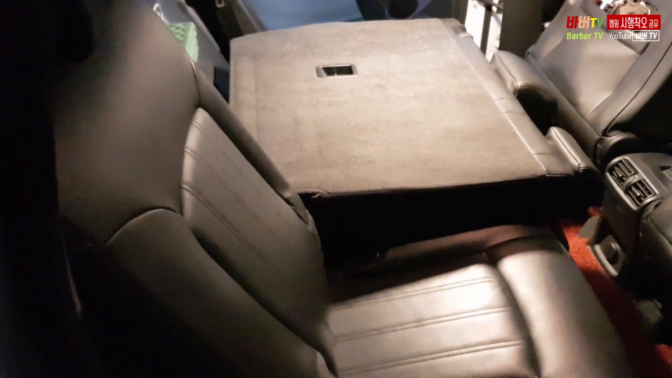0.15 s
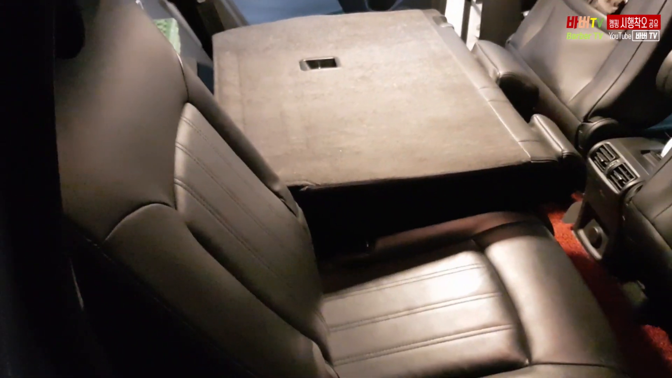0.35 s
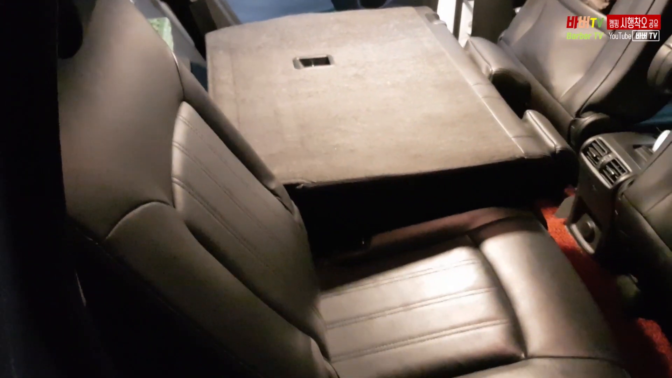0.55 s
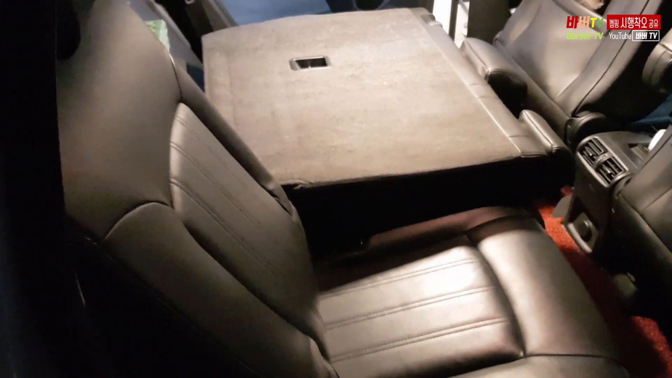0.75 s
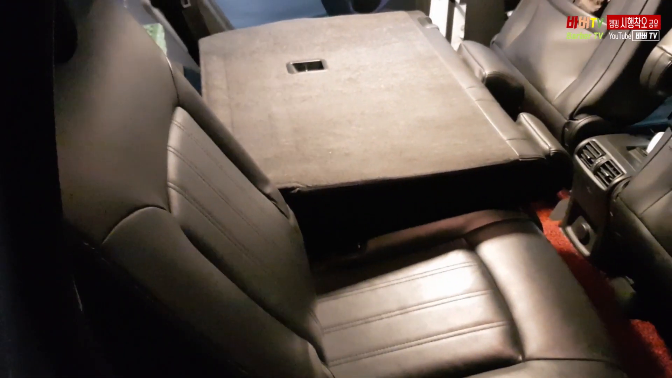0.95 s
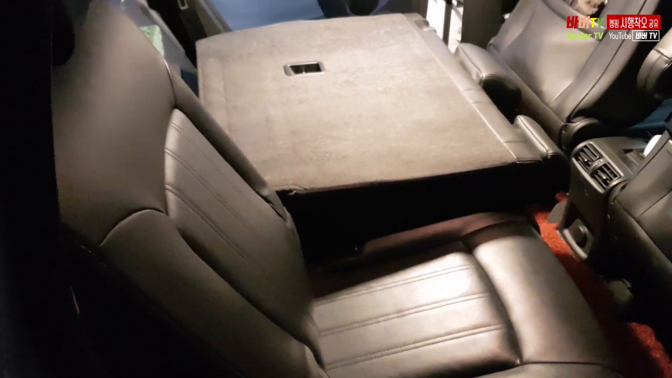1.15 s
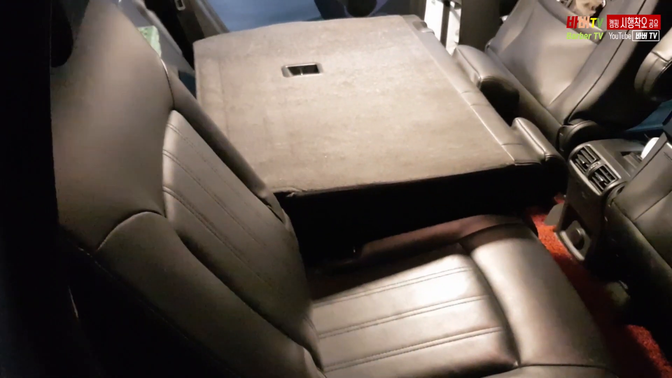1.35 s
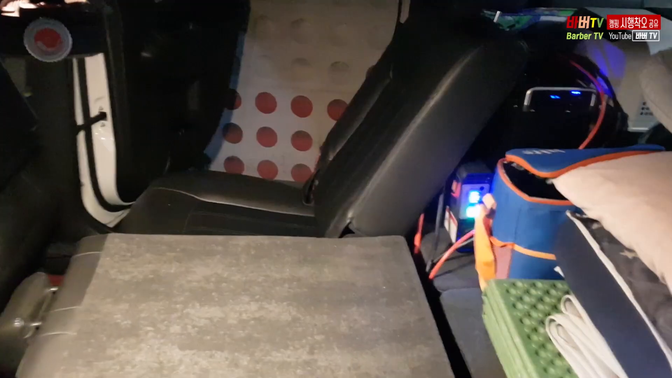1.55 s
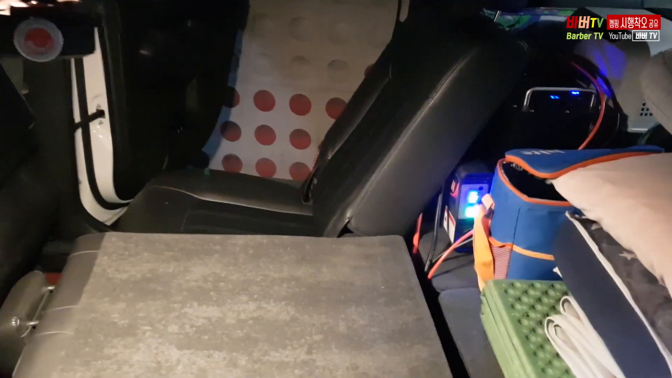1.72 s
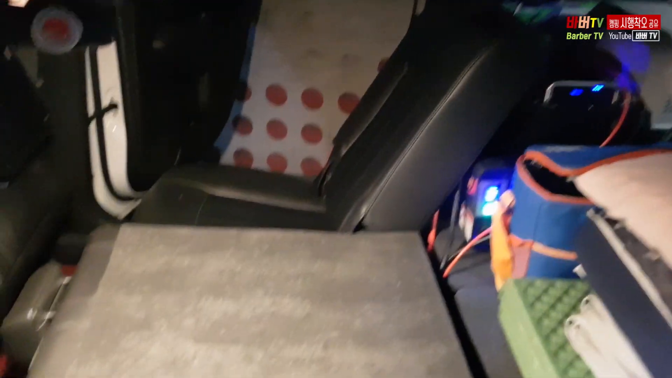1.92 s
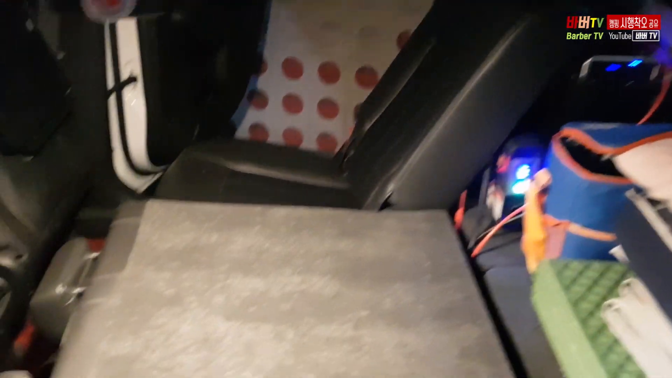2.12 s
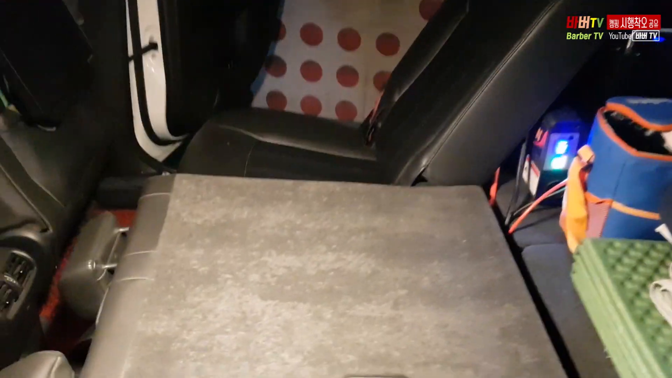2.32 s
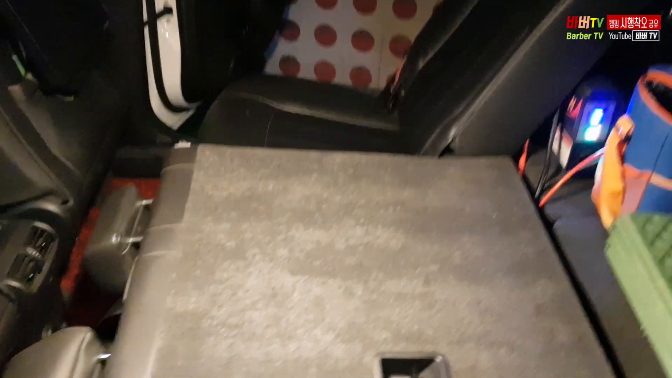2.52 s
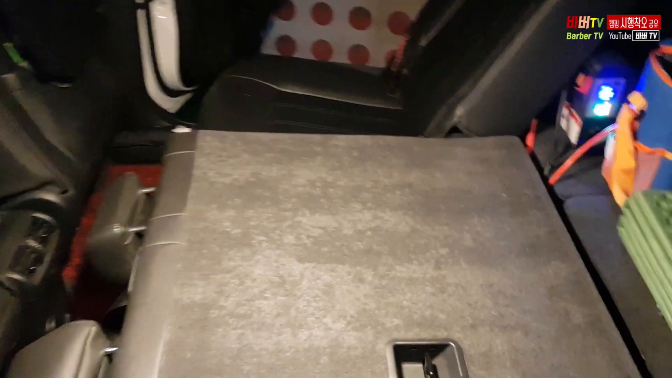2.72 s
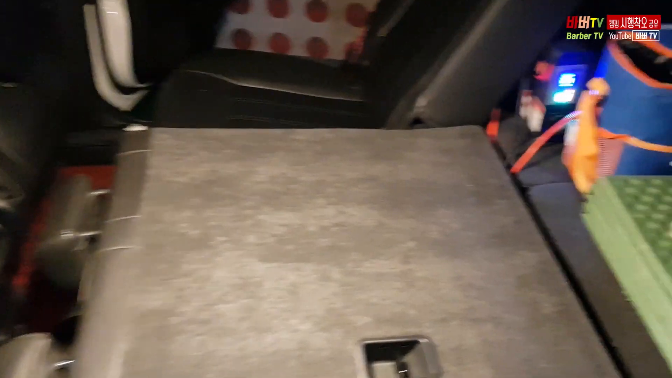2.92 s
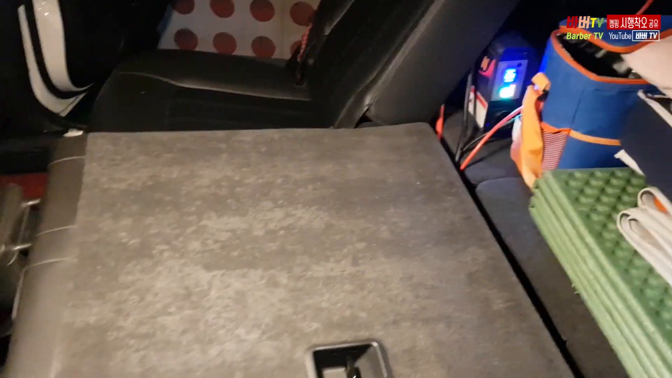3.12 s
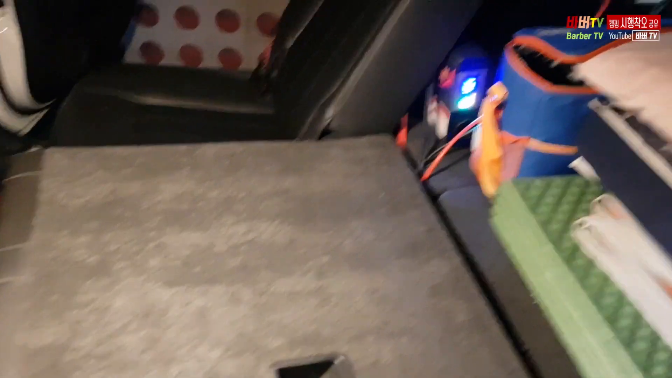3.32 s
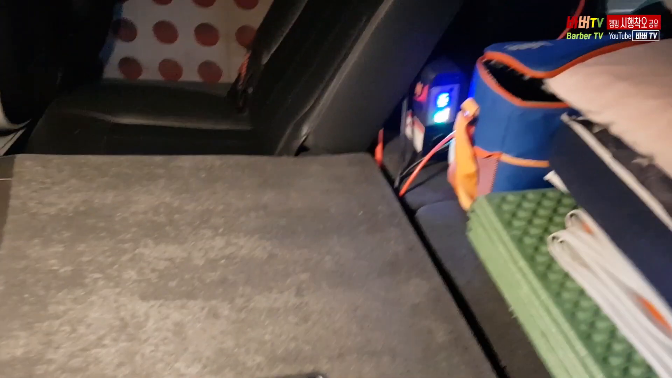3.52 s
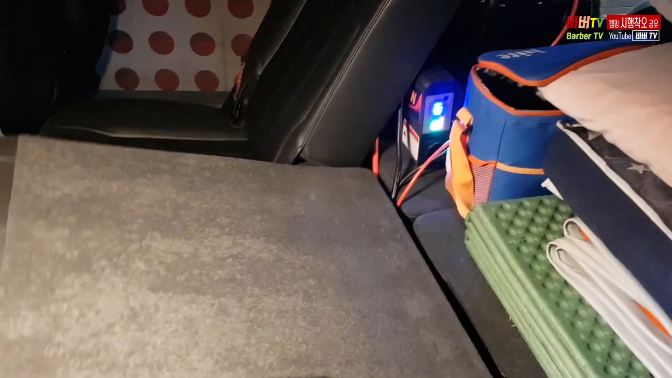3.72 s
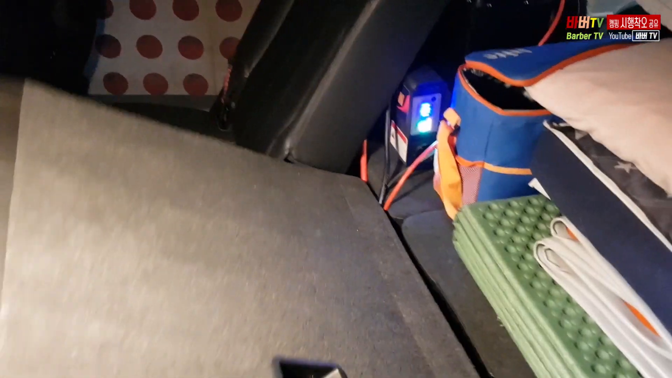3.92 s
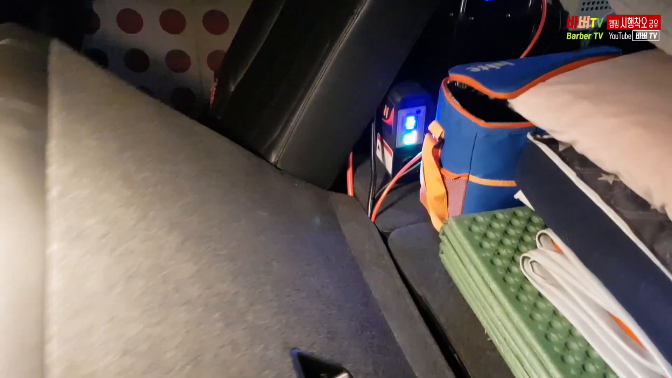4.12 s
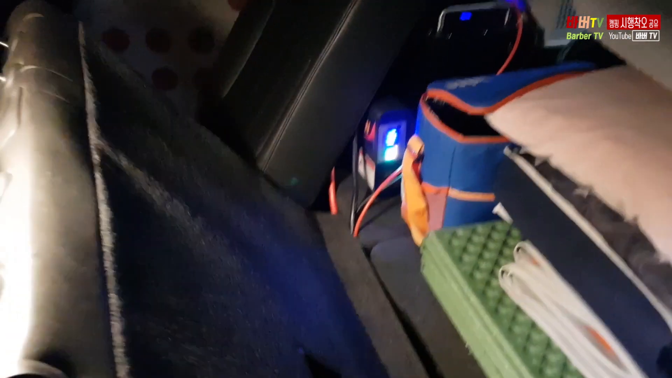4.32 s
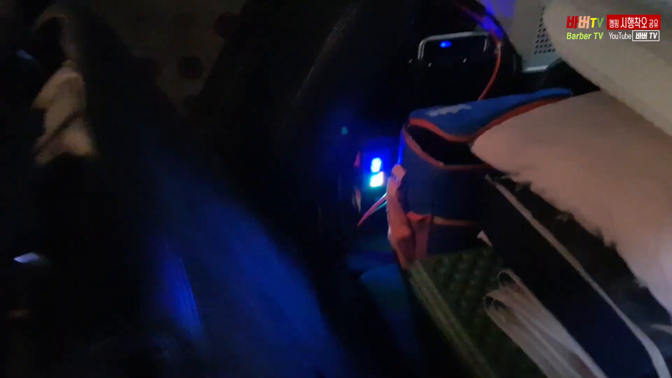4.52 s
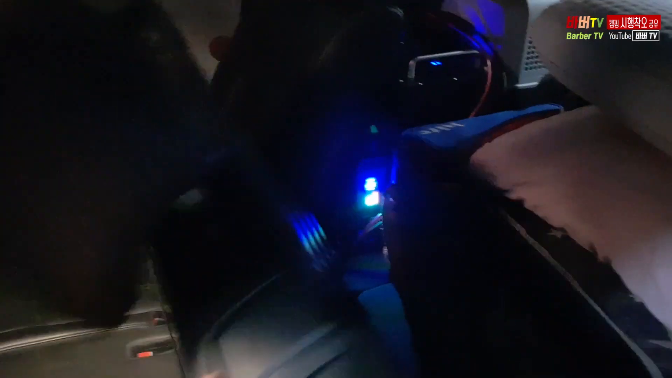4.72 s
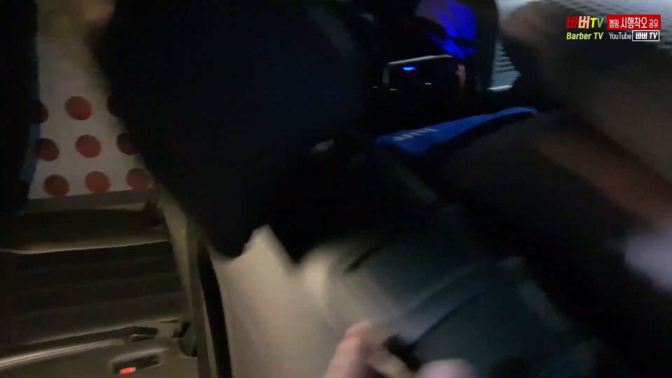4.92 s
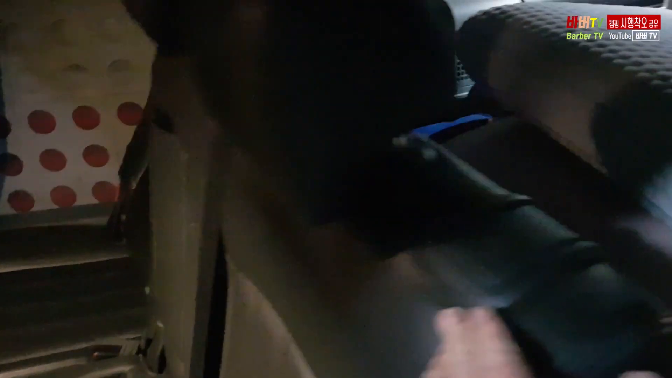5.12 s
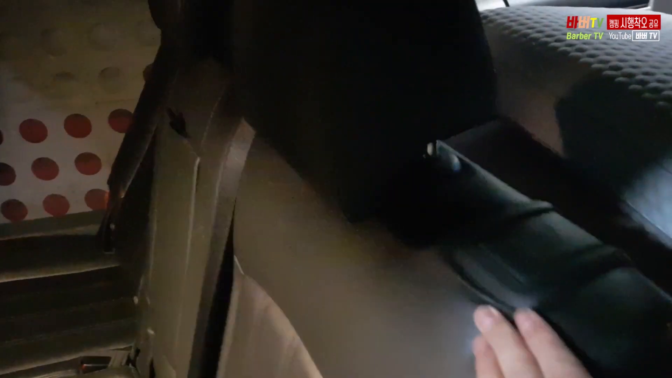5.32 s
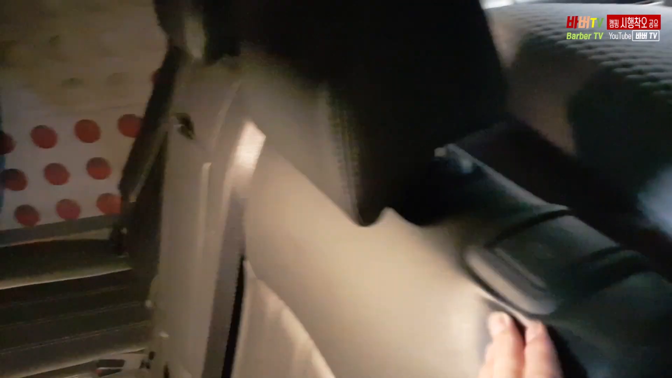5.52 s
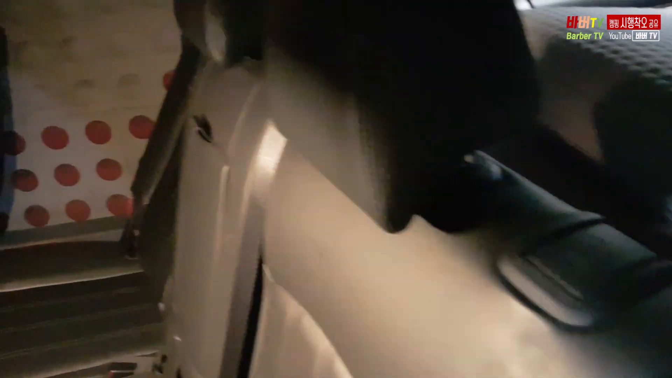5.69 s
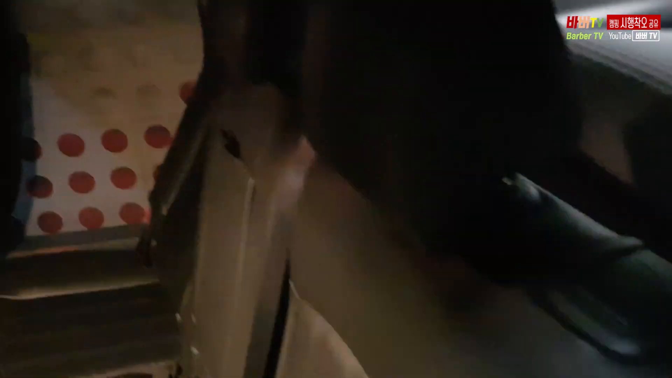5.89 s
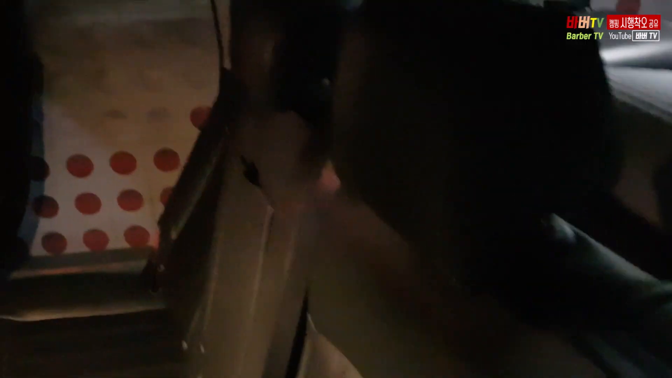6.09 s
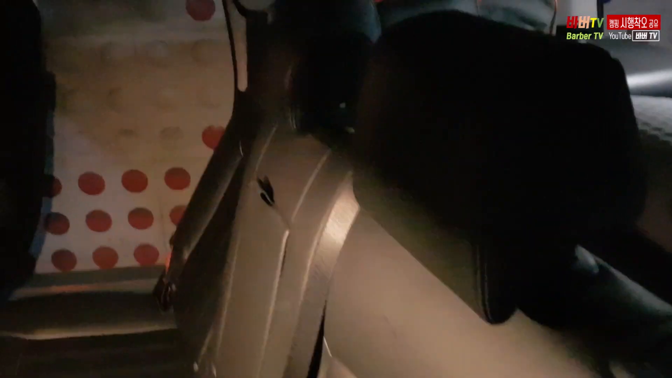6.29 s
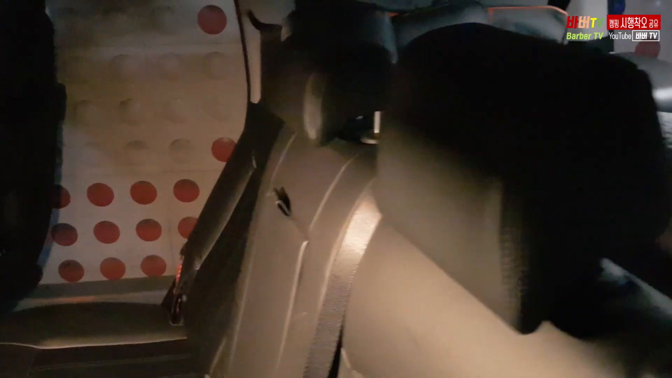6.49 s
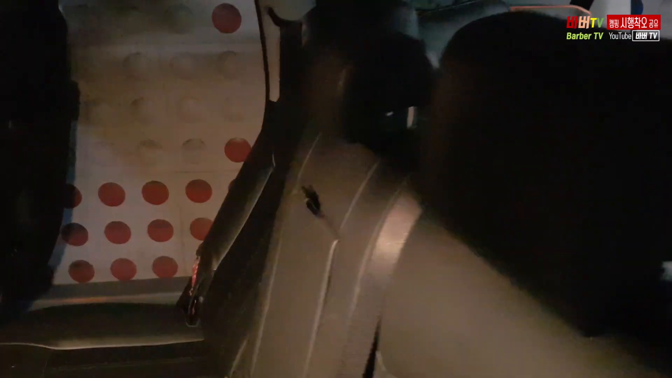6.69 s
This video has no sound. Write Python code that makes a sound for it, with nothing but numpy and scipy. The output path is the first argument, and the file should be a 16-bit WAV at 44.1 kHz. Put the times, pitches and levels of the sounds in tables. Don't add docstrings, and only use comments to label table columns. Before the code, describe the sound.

Inside a quiet car, short leather squeaks, scattered latch clicks, a loud clack with jingling metal, and a final heavy seatback clunk.

```python
import sys
import numpy as np
from scipy import signal
from scipy.fft import rfft, irfft, next_fast_len
from scipy.io import wavfile

SR = 44100
rng = np.random.default_rng(int(sys.argv[2]) if len(sys.argv) > 2 else 0)


def to_wav(s):
    ch = np.atleast_2d(s).T
    pcm = np.round(np.clip(ch, -1, 1) * 32767)
    wavfile.write(sys.argv[1], SR, pcm.astype(np.int16))


def elevation(decibels):
    levels = np.asarray(decibels, float)
    return 10 ** (levels / 20)


N = 297660
TIME_S = np.arange(N) / SR
STROKE_TIME_S = np.arange(0, N / SR, .001)

# t/s, level/dB
SHAKE = [(0, -38), (.25, -52.5), (.6, -43), (.92, -52.5), (1.6, -42.5), (1.9, -55), (2.05, -42.5),
         (2.2, -55), (3.1, -55.5), (3.4, -37.5), (3.65, -53), (3.8, -49), (4.7, -46), (5.2, -40.5),
         (5.36, -28), (6.0, -46.5), (6.75, -45.5)]
# f/Hz, density/dB
SHAKE_SPECTRUM = [(12, -38), (20, -3), (38, -4), (54, 1), (111, -7.5), (140, -11.5), (180, -44.5),
                  (310, -120)]
# t/s, level/dB
LOAD = [(0, -54), (.4, -56), (.6, -59.5), (.92, -69), (1.02, -51), (1.15, -65), (3.16, -62.5), (3.3, -44),
        (4.55, -47.5), (4.7, -35.5), (4.9, -41), (5.24, -45), (5.36, -23.5), (5.7, -42.5), (6.0, -61),
        (6.7, -63.5), (6.75, -62)]
# f/Hz, density/dB
LOAD_SPECTRUM = [(59, -30.5), (100, -4), (151, -0.5), (404, -8.5), (490, -18.5), (1000, -19.5), (1300, -48),
                 (2200, -120)]
# f/Hz, density/dB
AIR_SPECTRUM = [(380, -34.5), (650, -13), (714, -8), (974, -7), (3690, -13.5), (7600, -19.5),
                (12100, -18.5), (16200, -8.)]
# f/Hz, likeness/1
LIKENESS = [(40, 1), (300, .9), (700, 0.088), (1500, 0), (5000, 0.19), (15000, 0)]
# t/s, level/dB
FAN = [(0, -86), (.5, -80), (1.7, -78), (2.3, -75.5), (4.0, -75), (5.5, -83.5), (6.1, -93), (6.75, -92.5)]
# f/Hz, width/Hz, level/dB
FAN_BANDS = [(7350, 1200, 1.5), (12000, 1600, -3.5), (14800, 3500, -1.5)]
# start/s, end/s, level/dB, centre at start f/Hz, centre at end f/Hz
SLEEVE = [
    (0.784, 1.033, -62, 4830, 4810),
    (1.27, 1.415, -58, 4420, 2700),
]
# t/s, peak level/dB
TWANGS = [
    (5.557, -46),
    (5.673, -39.5),
    (5.79, -53),
]
# f/Hz, level/dB, t60/s
SPRING_MODES = [(4470, -11, 0.12), (4630, -17, 0.14), (4400, -17, .17), (4310, -21, 0.19)]
RING_HZ = [7420, 8200, 10525, 11956, 12592, 13780, 14086]
# t60/s, left minus right level/dB
RING_MODES = [(.3, 8), (.3, 4), (.4, 2.5), (.5, 6), (.15, 7.5), (.25, 6.5), (.5, 4.5)]
# t/s, peak level/dB, struck mode f/Hz, duration/s
JINGLE = [(4.567, -26, 12592, 0.035), (4.567, -37.5, 8200, 0.015), (4.572, -31.5, 14086, 0.062),
          (4.578, -33, 11956, 0.06), (4.575, -43, 7420, 0.06), (4.585, -38.5, 10525, 0.055),
          (4.606, -25, 13780, 0.018), (4.616, -35, 12592, 0.026), (4.64, -42.5, 7420, 0.015),
          (4.645, -27, 12592, 0.014), (4.645, -26.5, 13780, 0.012), (4.66, -18.5, 13780, 0.012),
          (4.66, -27, 10525, 0.008), (4.664, -31.5, 7420, 0.012), (4.672, -36.5, 8200, 0.03),
          (4.68, -30.5, 13780, 0.03), (4.69, -34.5, 10525, 0.05), (4.692, -39.5, 11956, 0.018),
          (4.712, -43, 13780, 0.02), (4.715, -43, 7420, 0.014), (4.747, -36.5, 7420, 0.019),
          (4.747, -28, 13780, 0.008), (4.747, -43, 10525, 0.012), (4.756, -25.5, 13780, 0.014),
          (4.756, -44, 11956, 0.02), (4.772, -33, 13780, 0.008), (4.772, -40, 7420, 0.01),
          (4.862, -53, 7420, 0.023), (4.897, -48, 7420, 0.02), (4.897, -41, 13780, 0.01),
          (4.911, -39, 13780, 0.008), (4.922, -44.5, 7420, 0.02), (4.922, -39, 13780, 0.022),
          (4.925, -52, 11956, 0.02), (4.945, -37, 7420, 0.008), (4.955, -28, 13780, 0.01),
          (4.955, -39, 8200, 0.045), (4.962, -34, 10525, 0.07), (4.963, -33.5, 7420, 0.008),
          (4.975, -26.5, 13780, 0.022), (4.976, -43, 7420, 0.024), (5.002, -49, 11956, 0.062),
          (5.005, -44.5, 13780, 0.025), (5.02, -46.5, 7420, 0.012), (5.0, -49, 8200, 0.08),
          (5.066, -44, 13780, 0.028), (5.066, -45, 10525, 0.028), (5.066, -49, 11956, 0.023),
          (5.105, -64, 10525, 0.025)]
# middle t/s, peak level/dB, f/Hz, half length/s
SQUEAKS = [(0.046, -20, 2388, 0.006), (0.064, -7.5, 2190, 0.0022), (0.074, -13.5, 1816, .008),
           (0.116, -20.5, 2374, 0.0038), (0.133, -3.5, 2280, .0035), (0.148, -10, 2194, 0.0024),
           (0.156, -7, 2267, 0.0022), (0.159, -15, 2283, 0.0053), (3.106, -44, 1135, 0.0066),
           (3.136, -45.5, 1216, 0.0177), (4.0145, -26, 2290, .0012), (4.018, -26, 2300, 0.0011),
           (4.033, -25.5, 2070, 0.0017), (4.068, -31, 2180, 0.0012), (4.146, -27.5, 2160, 0.00081),
           (4.218, -35.5, 2200, 0.0023), (4.311, -25.5, 2170, .003), (4.318, -24.5, 2200, 0.0018),
           (4.347, -21.5, 2050, .0015), (4.394, -8.5, 4600, 0.00092)]
# t/s, left minus right level/dB
BEARING = [(0, -2), (1.58, 7.5), (1.7, 16.5), (1.78, -1), (3.3, -2.5), (4.02, -8.5), (4.38, -2.5),
           (4.66, 5.5), (5.07, 6.5), (5.25, 1), (5.3, -6), (5.7, -4)]
# t/s, swell/s, fade/s, peak level/dB, sheen against rub level/dB
STROKES = [(.026, .004, 0.089, -15.5, -34), (0, 0.1589, .015, -20, -17.5), (0.17, .001, 0.088, -44, -9.5),
           (.3, .001, 4.8, -70, -7.5), (1.6, 0.03, 0.19, -74, 8.), (1.765, .03, 0.12, -46.5, -4),
           (1.929, .01, 0.086, -42, -9), (2.524, .135, 0.086, -47.5, -3), (2.698, .31, 0.0069, -62, 6),
           (3.022, .01, 0.041, -48.5, -2), (3.06, 0.0551, 0.1, -42.5, -7.5), (3.236, .015, .12, -39.5, -6),
           (3.3, .71, 0.19, -57.5, -7), (3.38, 0.08, 0.2, -49, -11.5), (4.013, .004, 0.086, -34.5, -6),
           (4.19, 0.15, 0.26, -30, -10), (4.11, .01, 0.13, -49.5, -7.5), (4.55, 0.028, 0.07, -32, -0.5),
           (4.659, .004, .04, -33, -3), (4.745, .085, .014, -36, -6.5), (4.85, 0.13, 0.0542, -42.5, -3.5),
           (5.0, 0.00084, 0.38, -49, -2.5), (5.251, .003, .014, -26, -25), (5.258, 0.01, .1, -36.5, -24.5),
           (5.38, 0.0091, 0.22, -51.5, -24), (5.599, .001, 0.31, -67, -4.5), (5.618, .045, .025, -67, 8.5)]
# f/Hz, density/dB
RUB_SPECTRUM = [(450, -44.5), (600, -25), (850, -23), (1400, -6.5), (2100, -3), (2450, -7.5), (4000, -15.5),
                (6000, -28.5)]
# f/Hz, density/dB
SHEEN_SPECTRUM = [(2650, -33), (4500, -8.5), (6520, -4.5), (7260, -6), (8170, -7), (14100, -16),
                  (17300, -22.5)]
# t/s, peak level/dB, f/Hz, t60/s,
# sharpness Q/1
SNAPS = [(.1575, -17, 2284, 0.018, 13), (.17, -44, 2260, 0.54, 14.), (.17, -37.5, 3303, 0.55, 0.9),
         (1.6195, -41, 8000, .008, 1.8), (1.625, -46, 9000, .008, 1.4), (1.65, -45, 9000, 0.0081, 1.5),
         (1.657, -45, 12470, .008, 2.5), (1.663, -45, 9000, .008, 1.5), (1.667, -36.5, 850, 0.013, 0.75),
         (1.667, -36.5, 5980, 0.01, 8.), (1.776, -44, 2000, 0.015, 1.7), (1.956, -41.5, 2190, 0.019, 3.5),
         (2.015, -42, 2070, 0.017, 2.5), (3.032, -30.5, 10990, 0.012, 2.5), (3.125, -36, 4500, .01, 1.5),
         (3.243, -25, 830, 0.24, 0.89), (3.242, -21, 2500, 0.016, 2.8), (3.29, -36.5, 2030, 0.07, 2.1),
         (4.194, -33.5, 2220, .05, 8.4), (4.225, -41.5, 1369, .15, 20.), (4.327, -25, 2110, .03, 6.),
         (4.405, -21, 1300, .015, 1.2), (4.5595, -20.5, 8500, 0.017, 1.7), (4.57, -20, 2096, 0.09, 3.),
         (4.6455, -8.5, 12530, .035, 2.5), (4.66, -4.5, 11510, .025, 2.), (4.666, -15.5, 10500, 0.074, 1.5),
         (4.679, -20, 13020, 0.055, 2.5), (4.774, -26, 13510, .06, 3.5), (4.826, -25, 5190, .015, 3.1),
         (4.89, -33.5, 1895, 0.033, 4.), (4.945, -29, 10400, 0.023, 5.5), (4.955, -19.5, 13090, .03, 3.5),
         (5.068, -33, 13000, 0.14, 3.5), (5.271, -17, 10500, 0.022, 1.5), (5.272, -12, 4400, 0.023, 3.8),
         (5.295, -39.5, 12000, .03, 1.5),
         (5.558, -55, 4480, 0.11, 16), (5.672, -50.5, 4500, 0.17, 16), (5.795, -61, 4420, 0.22, 12.),
            (5.62, -53, 1340, 1, 7.), (4.662, -19, 9500, 0.2, 1.8), (5.275, -35.5, 12000, .3, 1.5),
            (5.378, -48.5, 7500, .03, 2.5), (5.1, -41.5, 1800, .03, 3.5), (6.65, -52, 4000, .02, 1.2),
            (6.738, -54.5, 3000, .05, 1.1), (4.572, -24, 11000, .3, 1.6), (4.69, -30, 12000, .3, 1.6),
            (4.752, -28, 10000, .15, 1.6), (5.406, -49, 4600, .04, 30.), (5.605, -31, 670, .02, 1.1),
            (0.22, -45, 1830, .8, 12.), (1.589, -47, 450, 0.0093, 1.), (5.35, -34.5, 1640, 0.93, 2.3),
            (4.86, -42, 9500, .9, 1.3)]
# t/s, peak level/dB, share above 5 kHz level/dB, main ring f/Hz
TICKS = [(0.0264, -8, -26.5, 2350), (.123, -18.5, -22, 1430), (0.15, -18, -16, 1210),
         (1.589, -50, -13.5, 1062), (1.613, -46, 0.5, 7400), (1.634, -42.5, -1, 7400),
         (1.802, -37, -13.5, 1843), (1.819, -37, -9.5, 1820), (1.834, -33, -5.5, 1800),
         (1.855, -32, -19.5, 1860), (1.886, -38.5, -6.5, 2500), (2.158, -36, 3, 2150),
         (2.663, -27.5, -1.5, 2080), (2.92, -31, -1, 2290), (3.018, -31, -1, 2980),
         (3.037, -28.5, -3, 2224), (3.280, -21, -39, 2000), (3.337, -28.5, -6.5, 1700),
         (4.033, -26.5, -13, 2292), (4.095, -34, 0, 2198), (4.145, -26.5, -5, 2140),
         (4.346, -18.5, -5, 2000), (4.552, -26, -8.5, 2150), (4.647, -20.5, -12, 2040),
         (4.677, -26, -4.5, 5328), (4.827, -23, -25.5, 2000), (5.294, -25, -40.5, 2063),
         (5.31, -27, -43, 2000), (5.324, -28.5, -42.5, 1860), (5.605, -33.5, -37, 940)]
# t/s, peak level/dB, share above 5 kHz level/dB, main ring f/Hz, t60/s
CLACKS = [(1.6668, -20.5, 19.5, 1510, 0.0058), (1.937, -48, -9.5, 1755, 0.032),
          (2.525, -35, -36, 3680, 0.063), (3.222, -24.5, -7.5, 1880, 0.12), (3.243, -10, -11, 1850, 0.011),
          (3.436, -34, -27, 1490, 0.089), (4.013, -32.5, -18.5, 2440, 0.019),
          (4.335, -15.5, -8, 3132, 0.03), (4.385, -7, -11.5, 1500, 0.039), (4.442, -2.5, -3.5, 1870, .015),
          (4.566, 7, -11.5, 2094, 0.033), (4.66, -11.5, -7.5, 4860, 0.044),
          (4.748, -14, -13.5, 2150, 0.053), (4.804, -18, -13, 4800, 0.028), (4.955, -19.5, 12, 1392, 0.029),
          (4.963, -22, -5.5, 3950, 0.032), (4.979, -12, -4.5, 1792, 0.055), (5.065, -22, -7.5, 1735, 0.023),
          (5.267, -14, -31, 1260, 0.03), (5.2705, -3, -22, 1880, 0.041)]
# f/Hz, width/Hz, level/dB
LATCH_MODES = [(1230, 630, -5), (2000, 1100, -1), (2700, 350, -8.5), (3740, 620, -12.5), (5040, 1100, -8.5),
               (7415, 1300, -7)]
# t/s, knock peak level/dB, knock f/Hz, boom level/dB, boom f/Hz
KNOCKS = [
    (1.667, -22.5, 233, -17.5, 83.6),
    (4.442, -15, 337.7, -38.5, 109.7),
]
# t/s, knock peak level/dB, knock f/Hz, boom level/dB, boom f/Hz
THUDS = [(3.243, -13.5, 217, -28, 82.3), (3.279, -11.5, 158, -25.5, 76.5), (3.311, -16.5, 153, -40.5, 120),
         (3.338, -18.5, 200, -20, 80.7), (3.432, -37, 158, -42, 85.2), (3.965, -32, 145, -34.5, 91),
         (4.387, -12, 185, -33.5, 113), (4.404, -23, 282.5, -30, 118), (4.552, -23, 241, -39, 111),
         (4.663, -19.5, 187, -24.5, 56.4), (4.984, -21.5, 218, -38, 120), (5.005, -21, 283.3, -37.5, 118),
         (5.267, -6.5, 167, -19, 122.1), (5.289, -6.5, 268, -13, 53), (5.304, -7.5, 121, -35, 46.1),
         (5.329, -18.5, 306, -22, 38.2), (5.354, -16.5, 184, -17.5, 83.5), (5.4, -17.5, 125.9, -19, 37.7),
         (5.479, -30.5, 137, -23, 45), (6.737, -41.5, 174, -47.5, 42.4)]
# f/Hz, width/Hz, level/dB
PORTS = [(2150, 340, -18), (7400, 450, -7.5), (12000, 1723, -2.5)]

AIR_DB, HUM_HZ, HUM_DB = -75.5, 596, -82.5
CABIN_T60_S, CABIN_DB, SEAT_CUT_HZ = 0.94, -21, 2720
PANEL_HZ, PANEL_WIDTH_HZ, PANEL_DB, PANEL_CUT_HZ = 1850, 900, -7.5, 4800
BRUSH_EDGE_DB_PER_S = 240.5
THROB_HZ, THROB_DEPTH = 45, .6
SWELL_DB, FADE_DB, CATCH_S, LET_GO_S = 11, 10, 0.0044, 0.042
TICK_T60_S, KNOCK_T60_S, THUD_T60_S = 0.019, 0.036, 0.13


def rms_one(x):
    return x / np.sqrt(np.mean(x ** 2) + 1e-20)


def white():
    return rng.standard_normal((2, 2, N))


def at_s(rows, s=TIME_S):
    return np.interp(s, *np.transpose(rows))


def at_hz(points, hz):
    point_hz, value = np.transpose(points)
    return np.interp(np.log(hz), np.log(point_hz), value)


def drift(rate_hz):
    r = np.exp(-80 * np.pi * rate_hz / SR)
    slow = signal.lfilter([1], [1, -2 * r, r * r], rng.standard_normal(N // 40 + 2002))[2000:]
    return np.interp(np.arange(N) / 40, np.arange(len(slow)), rms_one(slow))


def band(x, low_hz, high_hz):
    return signal.sosfilt(signal.butter(2, [low_hz, high_hz], "band", fs=SR, output="sos"), x)


def resonate(x, hz, width_hz):
    r = np.exp(-np.pi * width_hz / SR)
    top = np.array([1, 0, -1]) * (1 - r * r) / 2
    return signal.lfilter(top, [1, -2 * r * np.cos(2 * np.pi * hz / SR), r * r], x)


def decay(t, t60_s):
    return elevation(-60 * t / t60_s)


def dying(t, hz, t60_s):
    return np.sin(2 * np.pi * hz * t) * decay(t, t60_s)


def seconds(length_s):
    return np.arange(round(length_s * SR)) / SR


def add(out, s, piece, pan_db, lag=0):
    for channel, side in enumerate((1, -1)):
        i = max(round(s * SR) + (lag if side > 0 else 0), 0)
        out[channel, i:i + len(piece)] += elevation(side * pan_db / 2) * piece[:max(N - i, 0)]


def coloured(source, spectrum, patchy_db, apart=1.):
    low_hz, high_hz = spectrum[0][0], spectrum[-1][0]
    edges = low_hz * 2 ** np.arange(0, np.log2(high_hz / low_hz) + .01, 1 / 3)
    out, together = 0, drift(5)
    for k, (low, high) in enumerate(zip(edges, edges[1:])):
        mid, side = band(source[k % 2], low, high)
        hz = np.sqrt(low * high)
        alike = np.clip(1 - apart * (1 - at_hz(LIKENESS, hz)), 0, 1)
        gain = elevation(at_hz(spectrum, hz) + patchy_db * (.6 * together + drift(14)))
        out = out + gain * (np.sqrt(1 + alike) * mid + np.sqrt(1 - alike) * side * [[1], [-1]])
    return rms_one(out)


def air():
    return elevation(AIR_DB) * coloured(white(), AIR_SPECTRUM, patchy_db=.5, apart=2.5)


def hum():
    return elevation(HUM_DB) * np.sin(2 * np.pi * HUM_HZ * TIME_S)


def hand():
    shake = elevation(at_s(SHAKE)) * coloured(white(), SHAKE_SPECTRUM, patchy_db=3, apart=1.5)
    load = elevation(at_s(LOAD)) * coloured(white(), LOAD_SPECTRUM, patchy_db=2.5)
    return (shake + load) * elevation([[.8], [-.8]])


def fan():
    noise, hiss = rng.standard_normal((2, N)), 0
    for hz, width_hz, band_db in FAN_BANDS:
        hiss = hiss + elevation(band_db) * resonate(resonate(noise, hz, width_hz), hz, width_hz)
    return elevation(at_s(FAN)) * rms_one(hiss)


def sleeve():
    levels_db, centres = [], []
    for start, end, level_db, start_hz, end_hz in SLEEVE:
        outside_s = np.maximum(np.maximum(start - TIME_S, TIME_S - end), 0)
        levels_db.append(level_db - BRUSH_EDGE_DB_PER_S * outside_s)
        centres += [(start, start_hz), (end, end_hz)]
    centre_hz = at_s(centres)
    noise, hiss = white(), 0
    for k, hz in enumerate(1200 * 2 ** np.arange(0, 2.7, 1 / 3)):
        hiss = hiss + band(noise[k % 2], hz / 1.14, hz * 1.14) * elevation(-5 * np.log2(hz / centre_hz) ** 2)
    hiss = signal.sosfilt(signal.butter(10, 7700, fs=SR, output="sos"), hiss)
    return elevation(np.max(levels_db, axis=0) + 6.5) * hiss


def cabin(x):
    size = next_fast_len(N + SR)
    hz = np.arange(size // 2 + 1) * SR / size
    t60_s = CABIN_T60_S / (1 + (hz / SEAT_CUT_HZ) ** 1.2)
    halves = []
    for lags_s in rng.uniform(.017, .061, (2, 11)):
        half = 0
        for k, lag_s in enumerate(lags_s):
            loop = decay(lag_s, t60_s) * np.exp(-2j * np.pi * hz * lag_s)
            half = half + (-1) ** k * loop / (1 - loop)
        halves.append(half)
    mid, side = halves
    echo = mid + side * (hz + 176.2) / (hz + 550) * [[1], [-1]]
    echo = echo * hz / (hz + 590)
    echo = echo * (1 + elevation(PANEL_DB) / (1 + (2 * (hz - PANEL_HZ) / PANEL_WIDTH_HZ) ** 2))
    echo = echo / np.sqrt(1 + (hz / PANEL_CUT_HZ) ** 4)
    return irfft(echo * rfft(x.mean(axis=0), size), size)[:, :N]


def spring():
    out, t = np.zeros((2, N)), seconds(.25)
    twang = sum(elevation(mode_db) * dying(t, hz, t60_s) for hz, mode_db, t60_s in SPRING_MODES)
    twang = twang * (1 - np.exp(-t / 0.0032))
    twang = twang * (1 - THROB_DEPTH * np.cos(2 * np.pi * THROB_HZ * t))
    for s, peak_db in TWANGS:
        add(out, s, elevation(peak_db) * twang, .6)
    return out * elevation(1.5 * drift(83))


def jingle():
    out = np.zeros((2, N))
    for s, peak_db, near_hz, length_s in JINGLE:
        detune, lean = rng.standard_normal(2)
        mode = np.argmin(np.abs(np.array(RING_HZ) - near_hz))
        t60_s, pan_db = RING_MODES[mode]
        t = seconds(length_s + .03)
        tone = dying(t, RING_HZ[mode] + 10 * detune, t60_s) * (1 - np.exp(-t / 0.0011))
        tone = tone * elevation(-1800 * np.maximum(t - length_s, 0))
        add(out, s, elevation(peak_db + 2) * tone, pan_db + 1.1 * lean, lag=-12)
    return out * elevation(4 * drift(220))


def squeaks():
    out = np.zeros((2, N))
    for s, peak_db, hz, half_s in SQUEAKS:
        t = np.arange(-3 * half_s, 3 * half_s, 1 / SR)
        tone = np.exp(-(t / half_s) ** 2) * np.sin(2 * np.pi * hz * t)
        add(out, s + t[0], elevation(peak_db) * tone, at_s(BEARING, s), lag=4)
    return out


def stroke_power(s, swell_s, fade_s, peak_db):
    times = np.cumsum([s - CATCH_S, CATCH_S, swell_s, fade_s, LET_GO_S])
    levels_db = peak_db - np.array([SWELL_DB + 30, SWELL_DB, 0, FADE_DB, FADE_DB + 30])
    return elevation(2 * np.interp(STROKE_TIME_S, times, levels_db, left=-200, right=-200))


def rubbing():
    powers = np.array([stroke_power(*row[:4]) for row in STROKES])
    sheen_share = elevation(2 * np.array(STROKES)[:, 4])
    rub_gain = np.sqrt(np.interp(TIME_S, STROKE_TIME_S, powers.sum(axis=0)))
    sheen_gain = np.sqrt(np.interp(TIME_S, STROKE_TIME_S, sheen_share @ powers))
    born = rng.random(N) < 900 * elevation(5 * drift(25)) / SR
    slips = 1 + 1.4 * born * elevation(4.6 * np.minimum(rng.exponential(1, N), 5))
    grain = white() * signal.lfilter([1], [1, -.9], slips)
    rub = rub_gain * coloured(grain, RUB_SPECTRUM, patchy_db=3.5)
    sheen = sheen_gain * coloured(grain, SHEEN_SPECTRUM, patchy_db=2.5)
    return (rub + sheen) * elevation(at_s(BEARING) / 2 * [[1], [-1]])


def snaps():
    out, t = np.zeros((2, N)), seconds(.4)
    for s, peak_db, hz, t60_s, sharpness in SNAPS:
        width_hz = hz / max(sharpness, 1)
        burst = (rng.standard_normal(len(t)) + 6 * (t == 0)) * decay(t, t60_s)
        burst = resonate(resonate(burst, hz, width_hz), hz, width_hz)
        pan_db = at_s(BEARING, s)
        add(out, s, elevation(peak_db) * burst / np.abs(burst).max(), pan_db, lag=round(-1.2 * pan_db))
    return out


def clicks():
    out, t = np.zeros((2, N)), seconds(.15)
    hits = sorted(CLACKS + [(*tick, TICK_T60_S) for tick in TICKS])
    noises = rng.standard_normal((len(hits), len(t)))
    colours_db = 3 * rng.standard_normal((len(hits), len(LATCH_MODES)))
    treble = signal.butter(2, 5000, "high", fs=SR, output="sos")
    for (s, peak_db, bright_db, hz, t60_s), noise, colour_db in zip(hits, noises, colours_db):
        pan_db = at_s(BEARING, s)
        fade = decay(t, t60_s)
        noise = noise + 5 * np.sign(noise[0]) * (t == 0)
        crack = noise * (fade + .07 * fade ** .25)
        body = 1.64 * resonate(crack, hz, hz / 4.2)
        for k, (mode_hz, width_hz, mode_db) in enumerate(LATCH_MODES):
            tilt_db = 0.36 * (bright_db + 11) * max(np.log2(mode_hz / 2000), 0)
            gain = elevation(mode_db + colour_db[k] + tilt_db)
            body = body + (-1) ** k * gain * resonate(crack, mode_hz, width_hz)
        edge = signal.sosfilt(treble, noise * (fade + .08 * fade ** .4))
        share = min(elevation(bright_db), 1)
        piece = np.sqrt(1.25 - share ** 2) * body / np.abs(body).max()
        piece = piece + share * edge / np.abs(edge).max()
        add(out, s, elevation(peak_db) * piece, pan_db, lag=round(-1.2 * pan_db))
    return out


def thuds():
    out, t = np.zeros((2, N)), seconds(.6)
    blows = [(*knock, KNOCK_T60_S) for knock in KNOCKS] + [(*thud, THUD_T60_S) for thud in THUDS]
    for s, knock_db, knock_hz, boom_db, boom_hz, t60_s in sorted(blows):
        noise = rng.standard_normal(len(t))
        puff = band(noise, 190, 560) * elevation(-130 * t / t60_s)
        knock = dying(t, knock_hz, t60_s) + .5 * dying(t, 1.55 * knock_hz, t60_s) + 5.4 * puff
        knock = knock * (1 - np.exp(-t / 0.00031))
        boom = dying(t, boom_hz, 1.4 * t60_s) * (1 - np.exp(-t / 0.0073))
        piece = elevation(knock_db - 5) * knock + elevation(boom_db + 4.5) * boom
        add(out, s, piece, 1.2 + 4.6 * noise[1], lag=round(7 * noise[0]))
    return out


def scene():
    seat = clicks() + thuds() + spring() + rubbing()
    close = squeaks() + jingle()
    background = hand() + air() + hum() + sleeve()
    seat = seat + snaps()
    background = background + fan()
    return background + close + seat + elevation(CABIN_DB) * cabin(seat + 0.19 * close)


def low_pass(x):
    return signal.sosfilt(signal.butter(12, 15950, fs=SR, output="sos"), x)


def record(dry):
    heard = dry + sum(elevation(peak_db) * resonate(dry, hz, width_hz) for hz, width_hz, peak_db in PORTS)
    heard = signal.sosfilt(signal.butter(2, 30, "high", fs=SR, output="sos"), heard)
    heard = signal.sosfilt(signal.cheby2(16, 60, 16800, fs=SR, output="sos"), heard)
    return low_pass(np.clip(heard, -1, 1))


dry = scene()
out = record(dry)
to_wav(out)
```